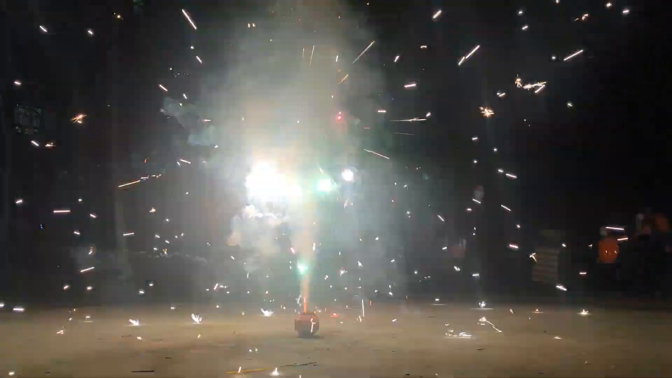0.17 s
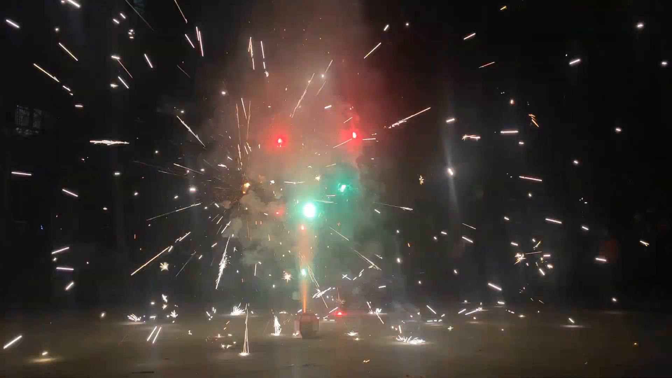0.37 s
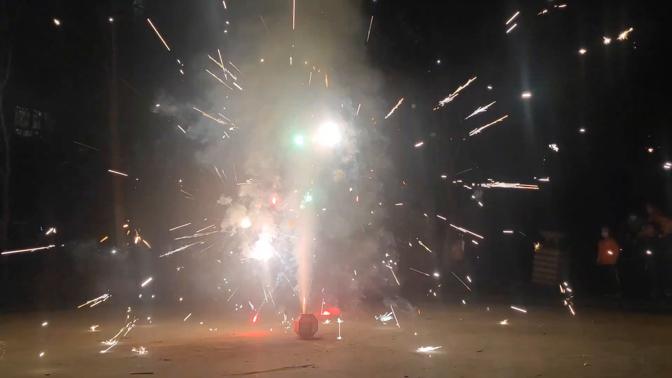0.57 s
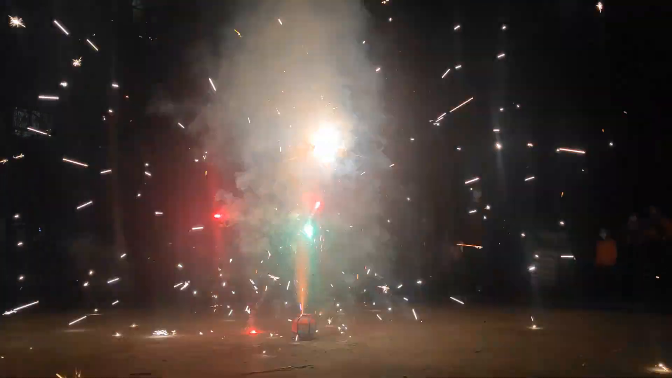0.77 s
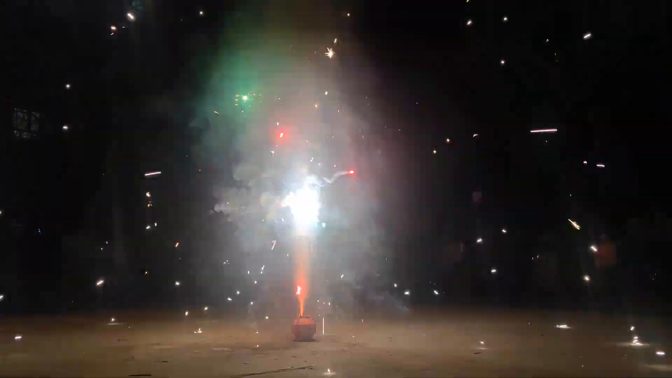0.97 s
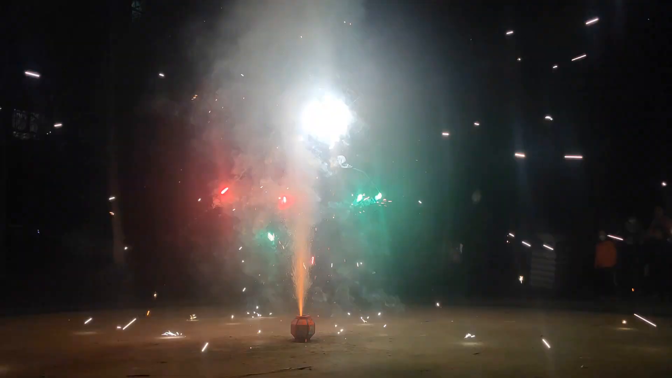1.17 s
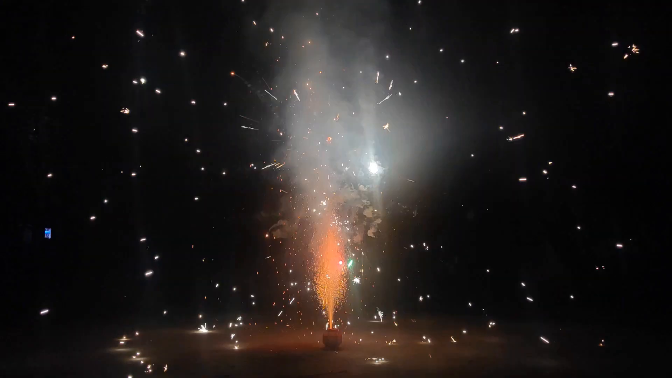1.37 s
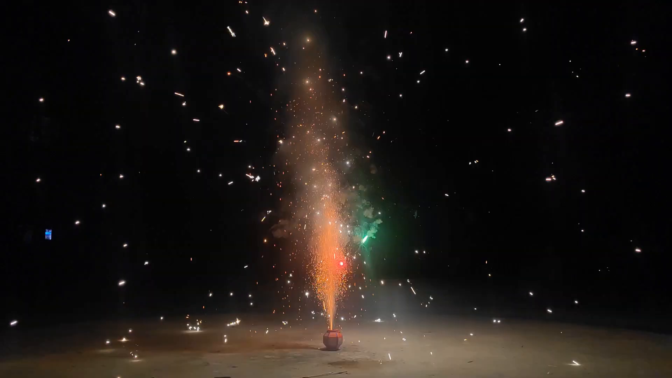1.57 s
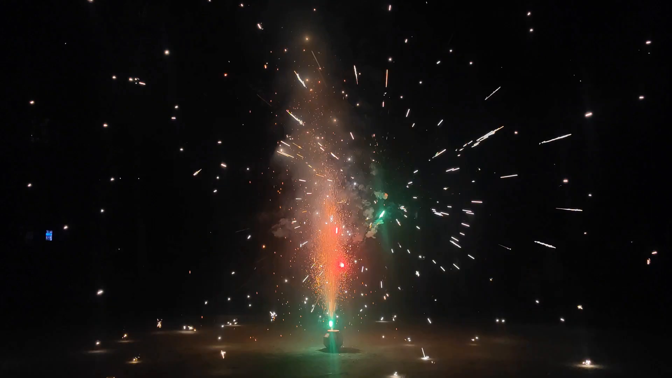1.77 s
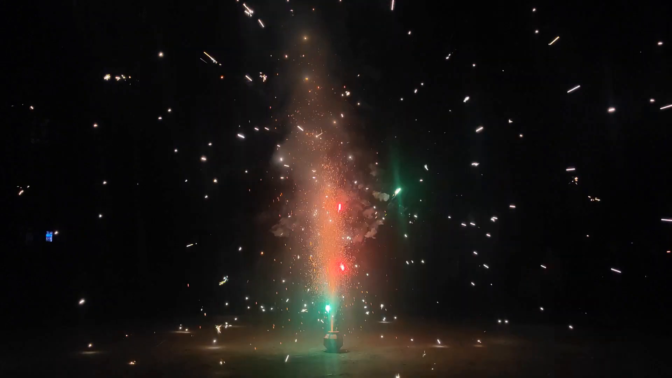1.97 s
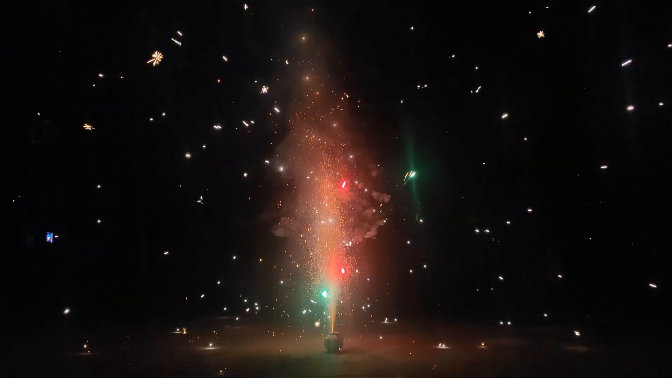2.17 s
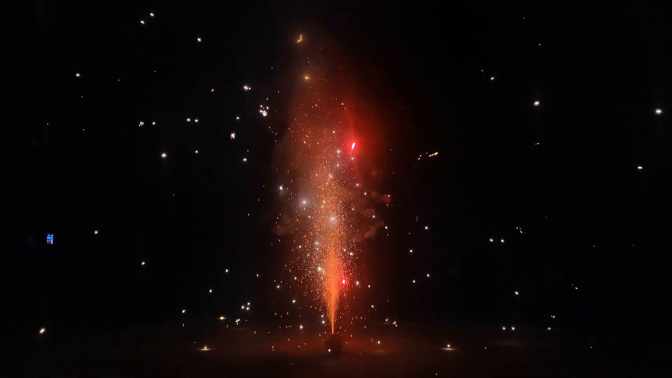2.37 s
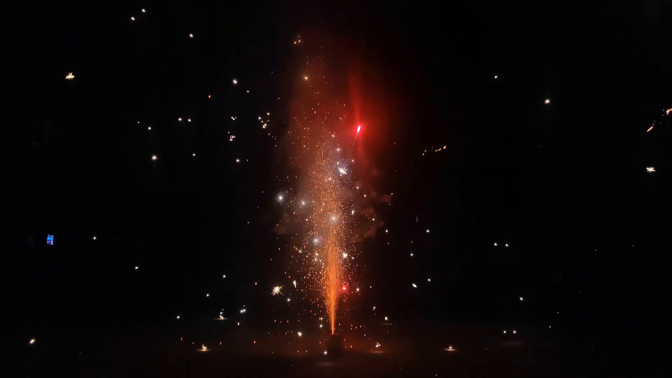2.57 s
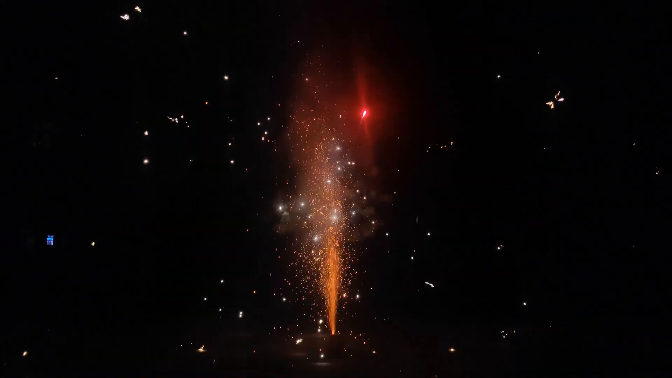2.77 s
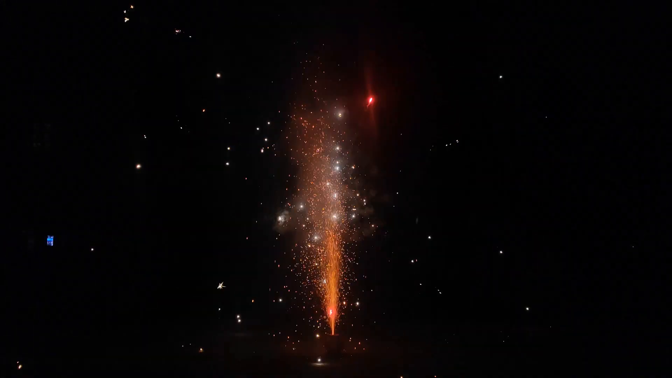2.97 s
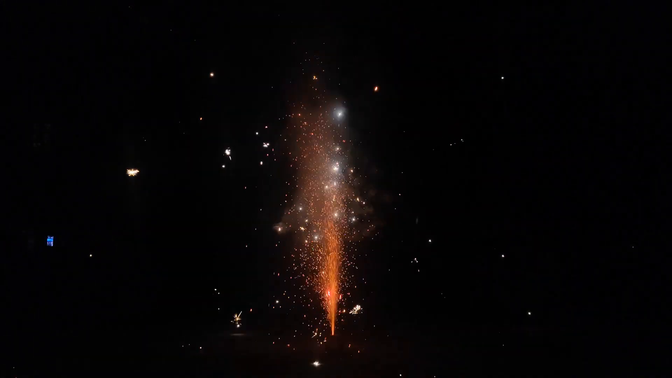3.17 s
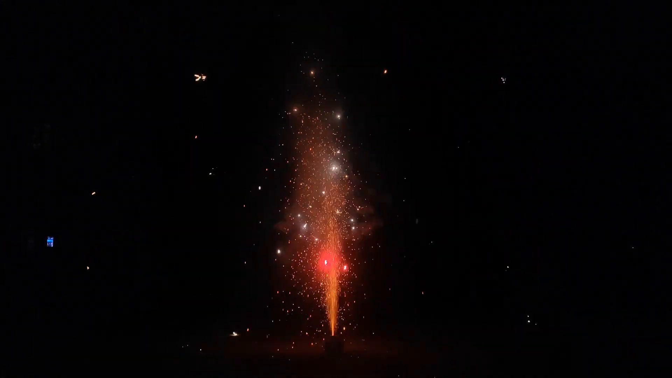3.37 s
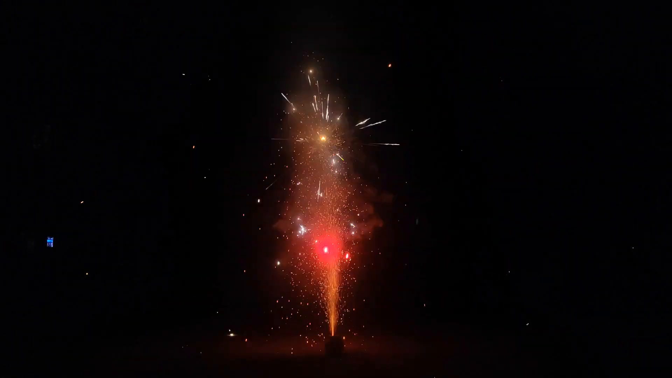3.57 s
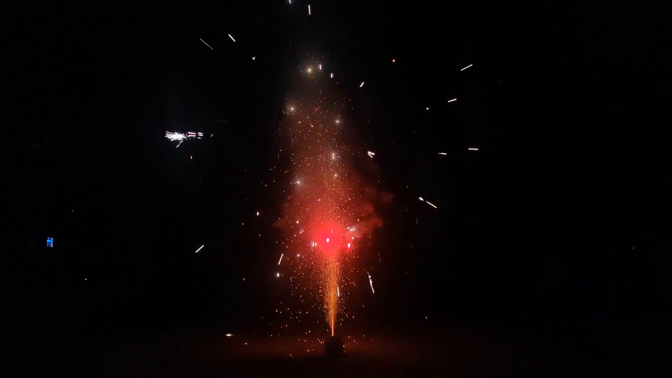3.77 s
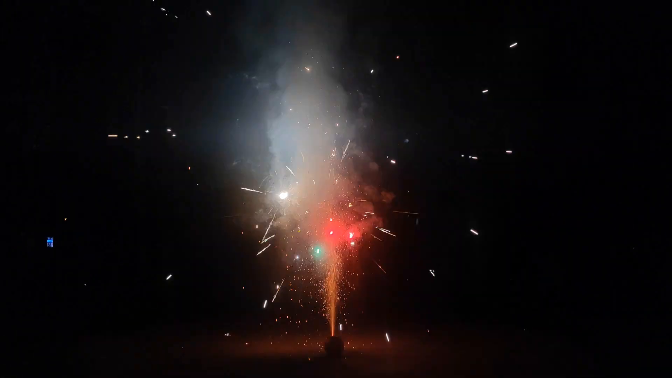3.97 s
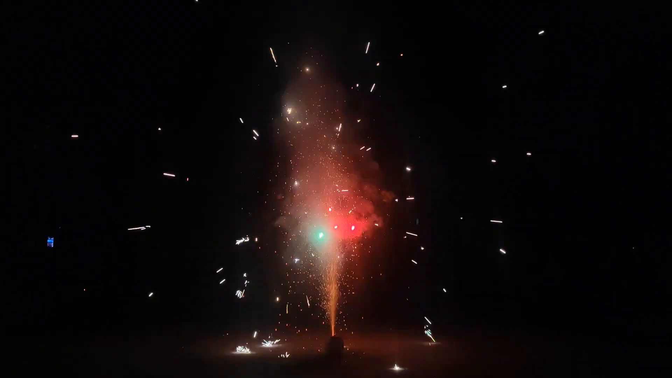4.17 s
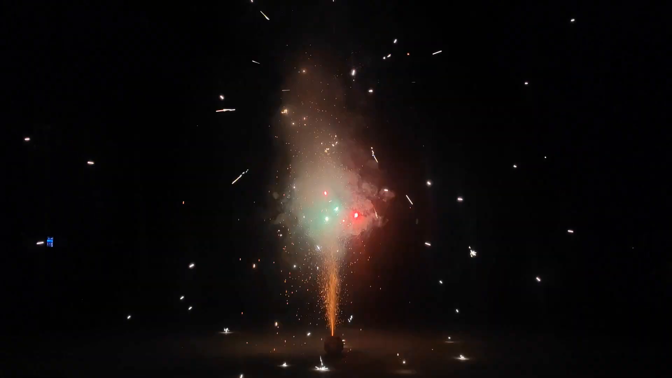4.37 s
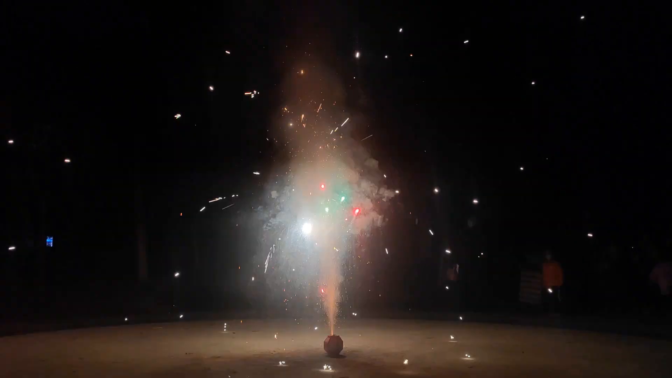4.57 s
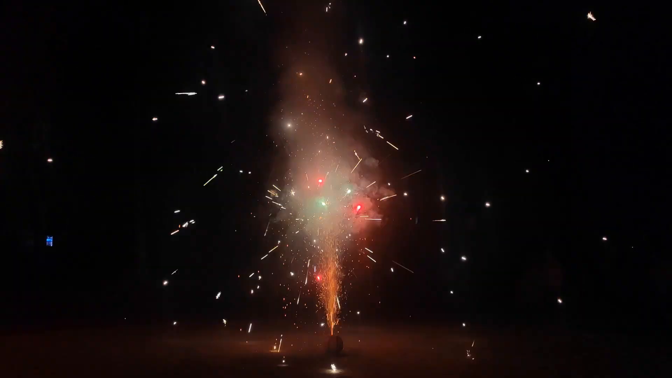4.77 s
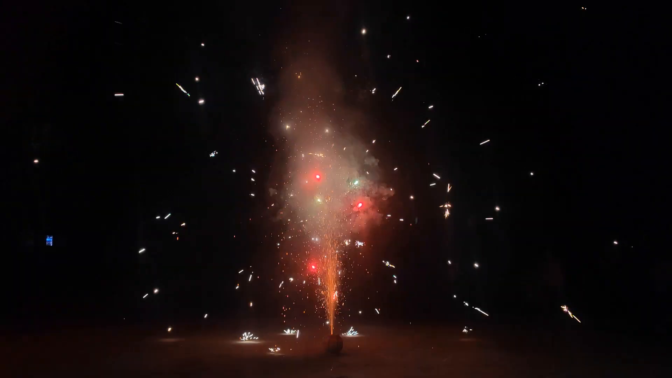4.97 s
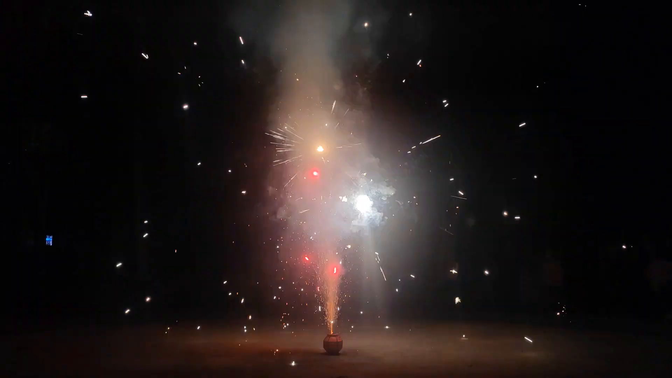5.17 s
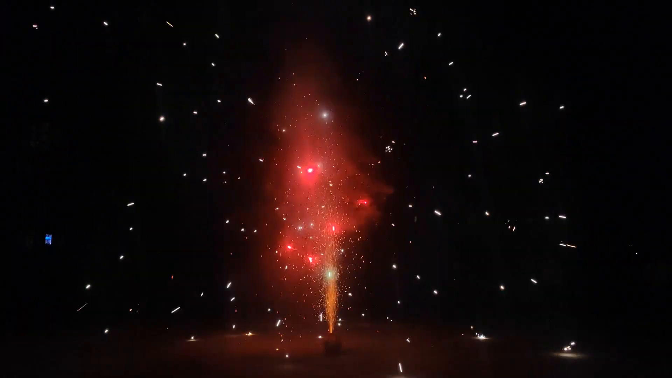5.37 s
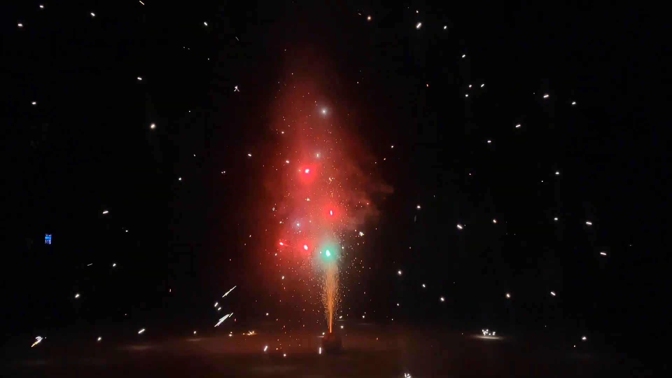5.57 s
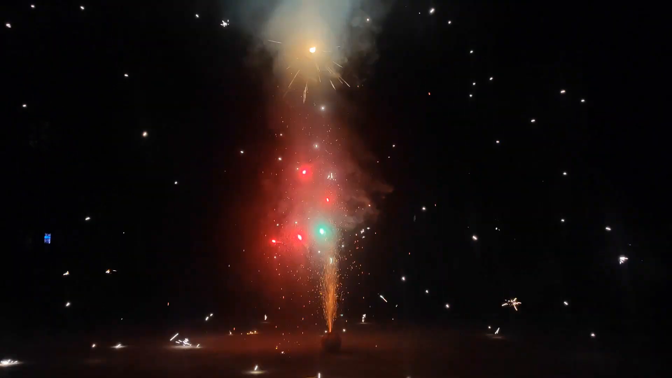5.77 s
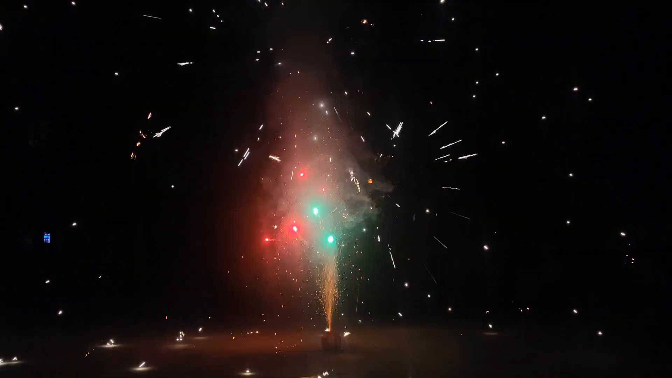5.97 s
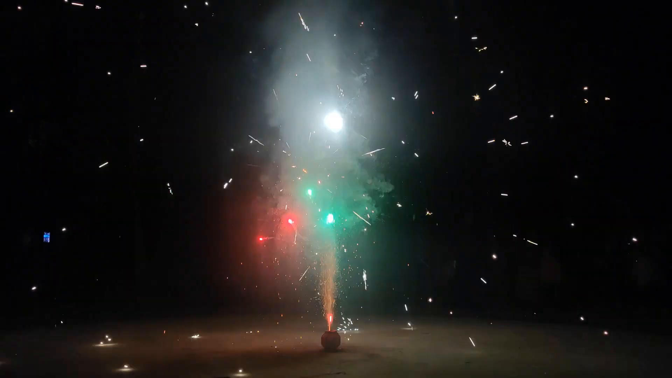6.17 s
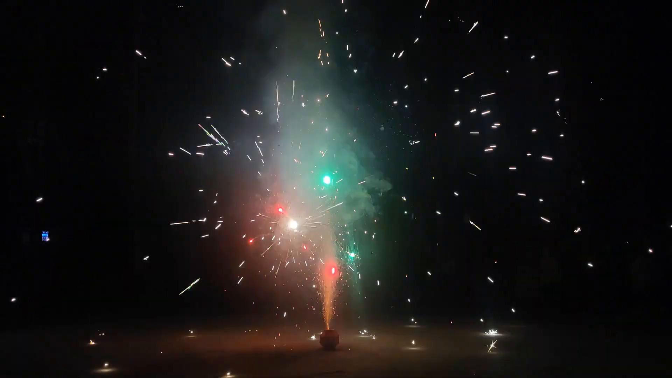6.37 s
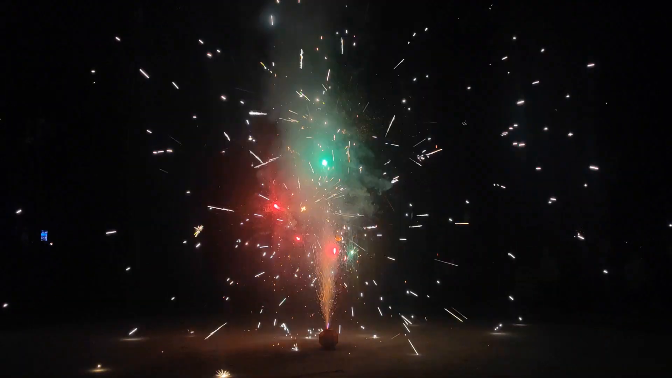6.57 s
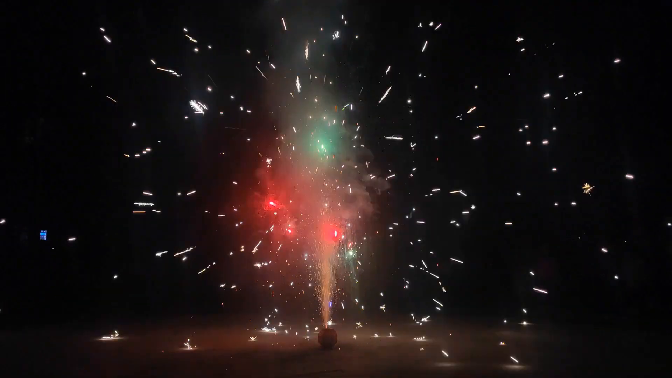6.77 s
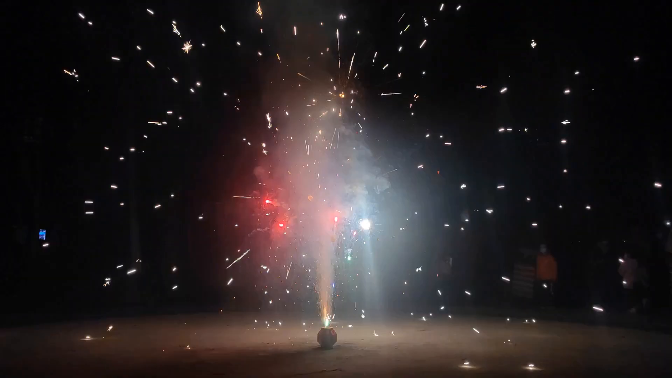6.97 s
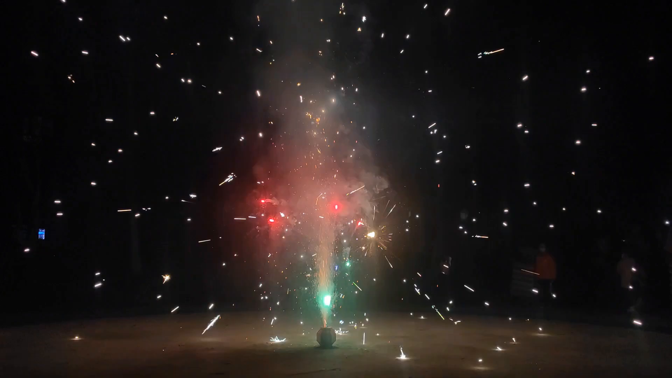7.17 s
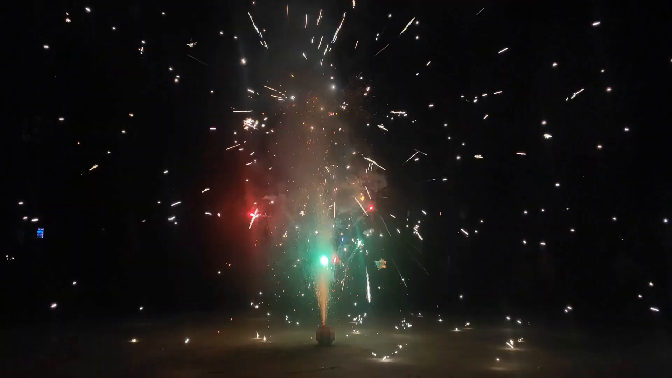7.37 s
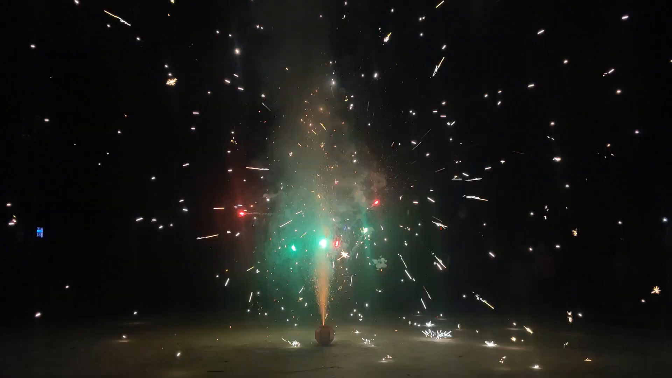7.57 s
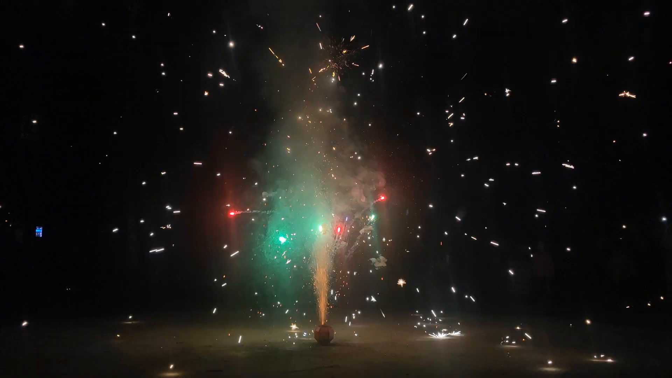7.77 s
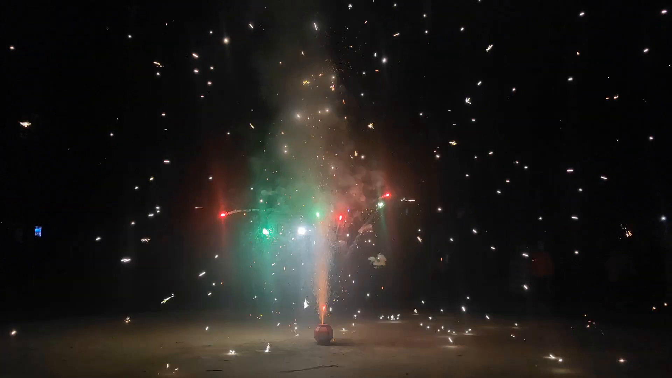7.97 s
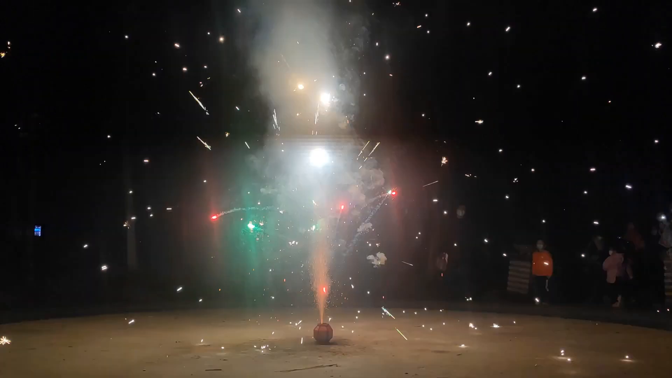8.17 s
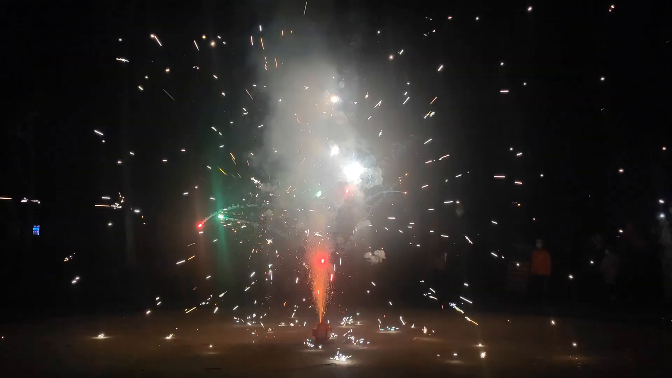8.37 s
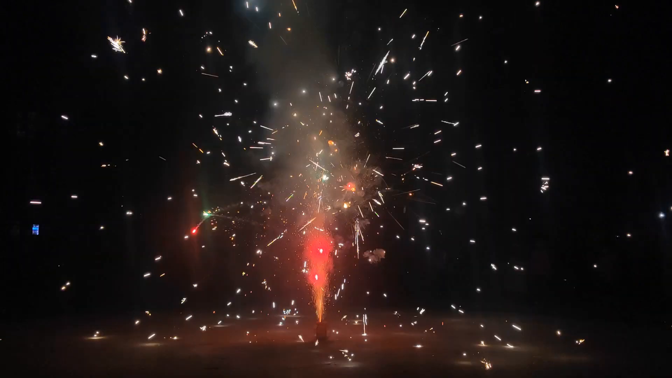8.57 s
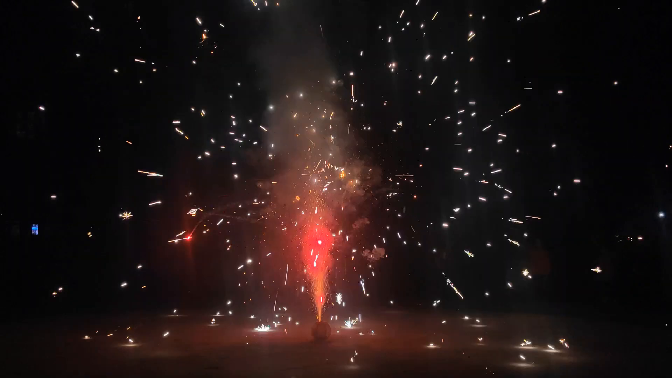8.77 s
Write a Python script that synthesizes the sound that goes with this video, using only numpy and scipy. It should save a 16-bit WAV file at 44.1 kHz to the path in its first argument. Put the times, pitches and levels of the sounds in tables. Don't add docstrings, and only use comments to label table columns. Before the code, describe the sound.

Outdoors at night in a walled yard, a ground fountain firework spits a dense volley of sharp, distorted cracks with quick wall echoes, close to a phone microphone. After about a second the sound dips and resumes five times slower: low, dull booms with dragging echoes, then a lull of muffled jet roar and small clicks, ended by a sudden bang and returning heavy crackle.

```python
import sys
import numpy as np
from scipy import signal
from scipy.fft import rfft, irfft, next_fast_len
from scipy.io import wavfile
from scipy.ndimage import uniform_filter1d

SR = 44100
rng = np.random.default_rng(int(sys.argv[2]) if len(sys.argv) > 2 else 0)


def store_wav(level_fs):
    pcm = np.round(np.clip(np.atleast_2d(level_fs), -1, 1) * 32767)
    wavfile.write(sys.argv[1], SR, pcm.T.astype(np.int16))


def ratio_of_db(decibels):
    return 10 ** (np.asarray(decibels, float) / 20)


N = 388080
SPLICE_S, SLOWER = 1.266, 5
CUT = round(SPLICE_S * SR)
LIVE = CUT + (N - CUT) // SLOWER + 1


def evened(x):
    return x / np.sqrt(np.mean(x ** 2) + 1e-20)


def read(points, hz):
    f, value = np.transpose(points)
    return np.interp(np.log(hz + 1), np.log(f + 1), value)


def live(s):
    s = np.asarray(s)
    true_s = np.where(s < SPLICE_S, s, SPLICE_S + (s - SPLICE_S) / SLOWER)
    return np.round(SR * true_s).astype(int)


# t/s, burst level/dB, echo level/dB, push left/full scale, push right/full scale
POPS_AT_SPEED = [(0.021, -17, -15.5, -0.058, -0.18), (0.034, -7.5, -18, .35, -0.19),
                 (0.052, -18, -13.5, -0.12, 0.14), (0.084, -5, -18.5, .5, -0.26),
                 (0.095, -9, -14, -0.51, -.05), (0.115, -11, -14, 0.18, -0.045),
                 (0.199, -8, -16.5, 0.72, .05), (0.241, -14.5, -17, -.17, 0.23),
                 (0.344, -9, -15, .23, 0.16), (0.364, -10.5, -16.5, -0.24, 0.017),
                 (0.379, -15, -18, 0.013, .27), (0.401, -6, -15.5, -0.15, -0.26),
                 (0.541, -15, -13.5, -0.075, -0.14), (0.646, -7.5, -19, -0.3, -0.12),
                 (0.692, -10, -15, 0.41, -0.17), (0.715, -3, -12.5, -0.62, 0.084),
                 (0.76, -13, -14.5, .22, 0.014), (0.842, -6, -15, .33, -0.031),
                 (0.862, -9, -21.5, -0.29, -.2), (0.919, -9, -16.5, -0.12, .2),
                 (0.961, -13, -21, 0.37, -0.12), (1.004, -10.5, -19, -0.088, .21),
                 (1.121, -12, -12, -0.037, -0.29), (1.209, -5, -12, -0.45, 0.022)]
POPS_BEFORE_LULL = [
    (1.267, -8, -14.5, 0.019, .02),
    (1.34, -9.5, -15.5, 0.018, 0.22),
    (1.407, -12, -16.5, .02, -.05),
    (1.447, -8.5, -15, 0.024, -0.15),
    (1.659, -9, -17.5, 0.046, 0.066),
    (1.79, -13.5, -13, .02, -0.077),
    (1.947, -10.5, -15.5, .02, .02),
    (2.006, -11, -16, 0.12, -.05),
    (2.219, -10.5, -15, 0.025, -0.098),
]
POPS_AFTER_LULL = [(4.145, -5, -19.5, -.46, -0.22), (4.457, -7, -15, 0.23, 0.2),
                   (4.514, -7.5, -14.5, 0.077, .19), (4.865, -5, -15, -0.38, 0.1),
                   (5.075, -9, -17.5, .2, .05), (5.214, -5.5, -12.5, 0.2, -0.029),
                   (5.285, -7, -15, -.29, -0.1), (5.567, -8, -16.5, -0.035, 0.0051),
                   (5.664, -6.5, -13, 0.14, .25), (6.075, -10.5, -17, -0.43, -0.017),
                   (6.333, -6, -14, -.28, -.14), (6.439, -8, -15, -0.0025, -.17),
                   (6.676, -7, -13.5, 0.013, 0.0082), (6.851, -7, -17.5, .37, .2),
                   (6.913, -9, -16.5, -.28, -0.17), (7.091, -8.5, -14.5, -0.47, 0.21),
                   (7.153, -10.5, -20.5, -.56, -0.025), (7.46, -7.5, -15.5, -0.28, -0.068),
                   (7.598, -7, -19.5, 0.3, -0.37), (7.666, -11.5, -19, -0.19, 0.14),
                   (7.915, -7.5, -17, 0.48, 0.0069), (8.234, -10, -19, -0.089, -.2),
                   (8.543, -9, -16.5, 0.12, .21), (8.7, -6, -14, 0.025, 0.14)]
# t/s, burst level/dB
MORE_AT_SPEED = [(0.0, -16), (0.069, -17), (0.128, -7.5), (0.16, -17), (0.183, -21), (0.259, -11.5),
                 (0.268, -16), (0.298, -16.5), (0.32, -10.5), (0.338, -11), (0.418, -12), (0.426, -15.5),
                 (0.445, -12), (0.459, -14.5), (0.476, -10.5), (0.508, -11), (0.549, -15), (0.576, -11),
                 (0.586, -15), (0.664, -13), (0.683, -9), (0.752, -11.5), (0.814, -8.5), (0.868, -10.5),
                 (0.954, -13), (0.967, -11), (1.036, -21), (1.075, -8), (1.114, -21), (1.2, -10)]
# t/s, burst level/dB
MORE_SLOWED = [(6.4, -19.5), (6.596, -13), (6.637, -8), (6.715, -9), (7.006, -12.5), (7.182, -14),
               (7.273, -16), (7.535, -11), (7.632, -22), (7.717, -11), (7.753, -15.5), (7.962, -11),
               (8.005, -23), (8.069, -10.5), (8.102, -19), (8.276, -18.5), (8.668, -12.5), (8.777, -9)]


def stars():
    s, burst_db = np.vstack([MORE_AT_SPEED, MORE_SLOWED]).T
    echo_db = -14.5 + 0.18 * burst_db
    push = 0.62 * ratio_of_db(burst_db)[:, None] * rng.standard_normal((len(s), 2))
    lesser = np.column_stack([s, burst_db, echo_db, push])
    rows = np.vstack([POPS_AT_SPEED, POPS_BEFORE_LULL, POPS_AFTER_LULL, lesser])
    return rows[np.argsort(rows[:, 0])]


def sparkle(per_s, spread_db):
    heights = ratio_of_db(spread_db * np.minimum(rng.exponential(1, (2, LIVE)), 3))
    grains = heights * (rng.random((2, LIVE)) < per_s / SR)
    sharper = 1 + 2 * uniform_filter1d(grains, size=8, axis=1)
    return evened(rng.standard_normal((2, LIVE)) * sharper)


# t/s, level/dB
ROAR = [(1.3, -28), (1.901, -25), (2.3, -29.5), (2.6, -14.5), (3.39, -16), (3.6, -19), (4.28, -24.5),
        (4.5, -41), (5.87, -24.5), (6.4, -23.5), (7.6, -32), (8.499, -16.5), (8.8, -16)]


def roar_level(age):
    n = np.arange(LIVE)
    s, slow_db = np.transpose(ROAR)
    fast_db = -46
    level_db = np.where(n < CUT, fast_db, np.interp(n, live(s), slow_db) + 2.0)
    level_db = level_db - 8.2 * np.exp(-age / 0.065)
    wander = rng.standard_normal(LIVE)
    for _ in range(2):
        wander = uniform_filter1d(wander, size=300)
    lean_db = 0.5 * np.array([[1], [-1]])
    flutter_db = 1.7 * evened(wander)
    return level_db + lean_db + flutter_db


def split_bands(x, centres):
    size = next_fast_len(LIVE)
    hz, spectrum = np.fft.rfftfreq(size, 1 / SR), rfft(x, size)
    for one in np.eye(len(centres)):
        weight = read(list(zip(centres, one)), hz)
        yield irfft(spectrum * weight, size)[:, :LIVE]


# f/Hz, echo fading/dB per s, share of brightness/ratio,
# burst colour level/dB, roar colour level/dB, jet hiss level/dB
BANDS = [(120, 259.5, 0.38, 5.5, -12, -35.5), (393, 127, 1, 7, -2, -34), (1170, 72, 0.25, 6, 4, -37),
         (2720, 45, .1, 1.7, 1, -37), (5500, 64, 0.08, -3, -9, -38.5),
         (9600, 109.5, 0.36, -16.5, -19.5, -35.5), (15700, 184, 1, 2, -29, -35.5)]


def fire(pops):
    s, burst_db, echo_db = pops.T[:3]
    bright_db = 0.34 * (burst_db - echo_db - 8.5)
    start, n = live(s), np.arange(LIVE)
    last = np.clip(np.searchsorted(start, n, "right") - 1, 0, None)
    age = (n - start[last]) / SR
    plateau = np.clip((.0052 - age) / 0.0027, 0, 1)
    near_walls_db = 3.96 * np.exp(-age / 0.02)
    roar_db = roar_level(age)
    facing_db = np.array([[-2.6], [-.6]])
    out = np.zeros((2, LIVE))
    parts = split_bands(sparkle(per_s=870, spread_db=3.0), np.array(BANDS)[:, 0])
    for part, row in zip(parts, BANDS):
        _, fading, share, colour_db, dull_db, hiss_db = row
        burst = plateau * ratio_of_db(burst_db[last] + colour_db + facing_db)
        echo = ratio_of_db(echo_db[last] + near_walls_db + share * bright_db[last] - fading * age)
        jet_power = ratio_of_db(roar_db + dull_db) ** 2 + ratio_of_db(hiss_db) ** 2
        out += part * np.sqrt(burst ** 2 + echo ** 2 + jet_power)
    return out


def pushes(pops):
    kicks = np.zeros((2, LIVE))
    delay_s, rebound_s, far_wall_s = .0008, .0032, .011
    start, size = live(pops[:, 0]) + round(delay_s * SR), pops[:, 3:].T
    kicks[:, start] += size
    kicks[:, start + round(rebound_s * SR)] -= .2 * size
    kicks[:, np.minimum(start + round(far_wall_s * SR), LIVE - 1)] += .25 * size
    t, shove_s = np.arange(6000) / SR, .006
    shove = np.sin(np.pi * np.clip(t / shove_s, 0, 1)) ** 2
    creep = .25 * np.exp(-t / 0.024) * (1 - np.exp(-t / 0.0053))
    return signal.oaconvolve(kicks, (shove + creep)[None], axes=1)[:, :LIVE]


# t/s, level/dB
TICKS = [(2.724, -39), (2.953, -54), (3.065, -50), (3.097, -37), (3.352, -32), (3.392, -34.5), (3.435, -38),
         (3.56, -43), (3.671, -30), (3.749, -39), (3.776, -45), (3.824, -37), (3.903, -25.5), (4.016, -24),
         (4.402, -33)]


def ticks():
    out, shape = np.zeros((2, LIVE)), np.exp(-np.arange(40) / 9)
    for s, db in TICKS:
        grain = rng.standard_normal((2, 40)) * shape
        out[:, live(s):live(s) + 40] += ratio_of_db(db + 9.5) * grain
    return out


# f/Hz, level/dB
MIC_LEFT = [(400, 1), (1000, -4.5), (2000, -1), (3200, 1), (4200, -1.5), (5200, -1), (6300, -2.5),
            (7800, 3.5), (8600, -5.5), (10000, -7), (13000, -9.5), (16000, -8), (18500, -14),
            (20000, -30.5)]
# f/Hz, level/dB
MIC_RIGHT = [(400, -2.5), (1000, -4.5), (2000, -2), (3200, 1.5), (4200, 5), (5200, 8.5), (6300, 6.5),
             (7800, -6), (8600, -14), (10000, -10), (13000, -6), (16000, -7), (18500, -15.5), (20000, -36)]
# f/Hz, level/dB
CASING = [(450, 0), (750, 2), (1250, -2.5), (1900, 0.5)]


def microphones(x):
    hz = abs(np.fft.fftfreq(4096, 1 / SR))
    colour_db = np.array([read(MIC_LEFT, hz), read(MIC_RIGHT, hz)]) + read(CASING, hz)
    minimum_phase = np.exp(np.conj(signal.hilbert(np.log(ratio_of_db(colour_db)))))
    taps = np.fft.ifft(minimum_phase).real[:, :1024]
    taps = taps / np.sqrt((taps ** 2).sum() / 2)
    return signal.oaconvolve(x, taps, axes=1)[:, :LIVE]


def scene():
    pops = stars()
    sound = microphones(fire(pops) + ticks()) + pushes(pops)
    return np.pad(sound, ((0, 0), (0, N - LIVE)))


def patchy_treble(x):
    hz, t, z = signal.stft(x, SR, nperseg=512)
    block, strip = (t * SR / 1024).astype(int), (hz / 450).astype(int)
    luck = rng.random((strip[-1] + 1, block[-1] + 1))[strip][:, block]
    odds = np.where(hz > 15200, 0.44, .09 * (hz > 8500))[:, None]
    kept = z * np.where(luck < odds, .02, 1)
    return signal.istft(kept, SR, nperseg=512)[1][:, :x.shape[1]]


def true_speed(loud):
    lowpass = signal.firwin(255, 15700, fs=SR)[None]
    return patchy_treble(signal.oaconvolve(loud[:, :CUT], lowpass, "same", axes=1))


# f/Hz, level/dB
LEAK = [(3900, 0.5), (4040, -14), (4200, -49.5), (5000, -48), (6600, -49), (7000, -60.5), (7400, -52.5),
        (10300, -59.5), (10800, -67.5), (16000, -73)]


def slow_motion(loud):
    spaced = np.zeros((2, N - CUT))
    count = len(spaced[0, ::SLOWER])
    spaced[:, ::SLOWER] = SLOWER * loud[:, CUT:CUT + count]
    size = next_fast_len(N)
    smoothing = ratio_of_db(read(LEAK, np.fft.rfftfreq(size, 1 / SR)))
    return irfft(rfft(spaced, size) * smoothing, size)[:, :N - CUT]


# t/s, level/dB
FADE = [
    (1.243, 0),
    (1.247, -24),
    (1.262, -32),
    (1.27, -26),
    (1.285, -10),
    (1.31, -3),
    (1.35, 0),
]
# t/s, level/dB
DUCK = [
    (4.094, 0),
    (4.104, -9),
    (4.1405, -12),
    (4.143, 0),
]


def fade_and_duck():
    s, db = np.vstack([FADE, DUCK]).T
    return ratio_of_db(np.interp(np.arange(N) / SR, s, db))


def roll_off(x):
    return signal.sosfilt(signal.butter(12, 16290, fs=SR, output="sos"), x)


def record(dry):
    ceiling = .9
    loud = ceiling * np.tanh(dry / ceiling)
    mix = np.hstack([true_speed(loud), slow_motion(loud)]) * fade_and_duck()
    return roll_off(np.clip(mix, -1, 1))


dry = scene()
out = record(dry)
store_wav(out)
```